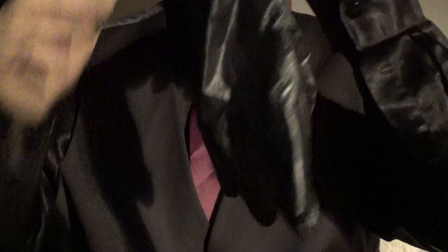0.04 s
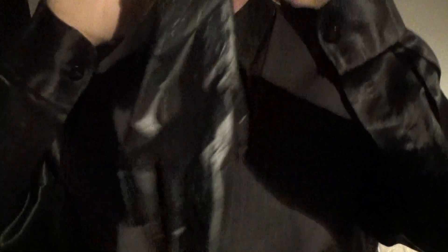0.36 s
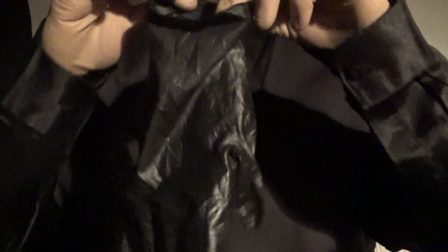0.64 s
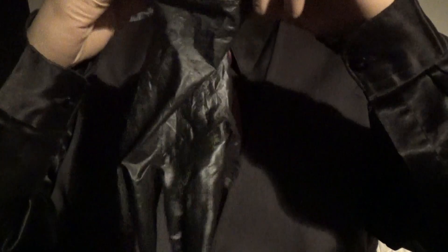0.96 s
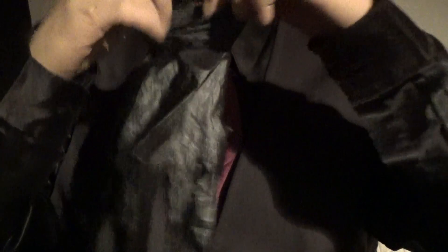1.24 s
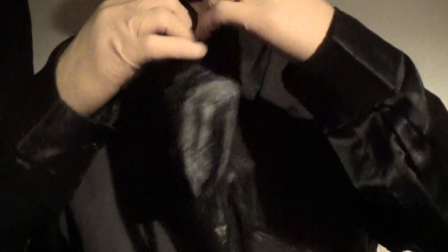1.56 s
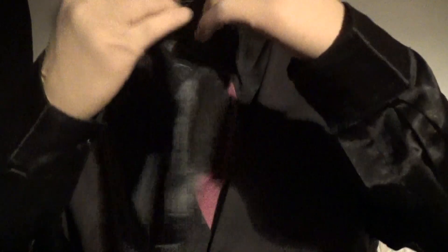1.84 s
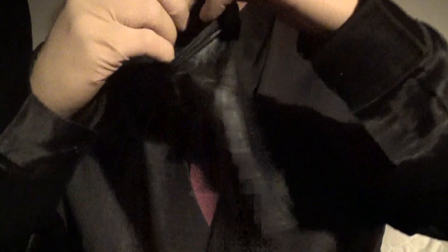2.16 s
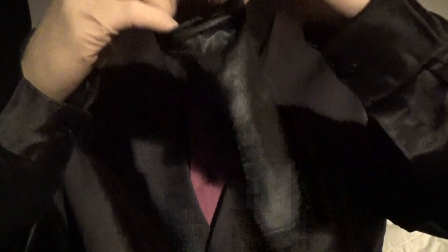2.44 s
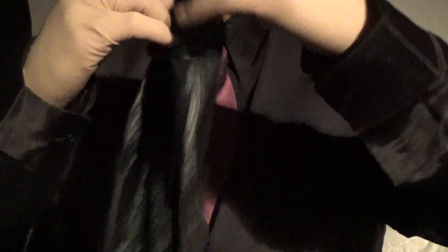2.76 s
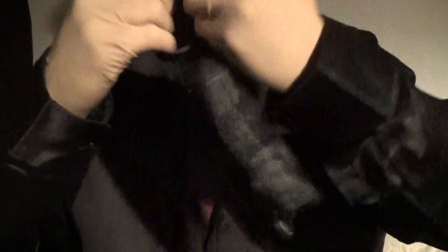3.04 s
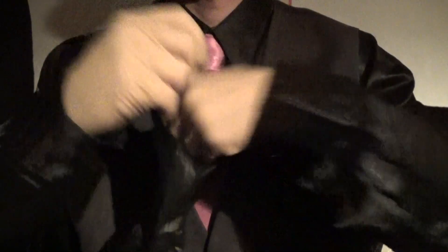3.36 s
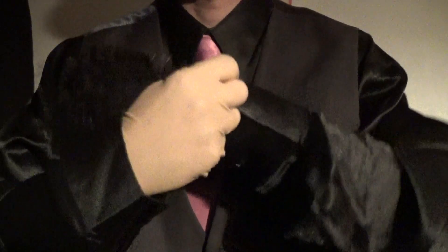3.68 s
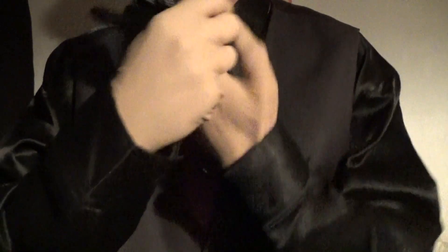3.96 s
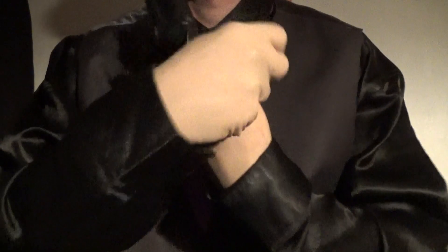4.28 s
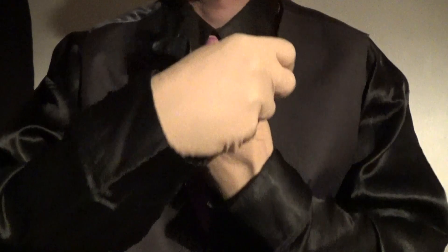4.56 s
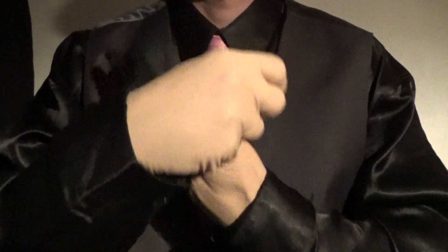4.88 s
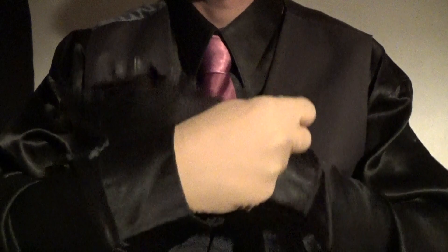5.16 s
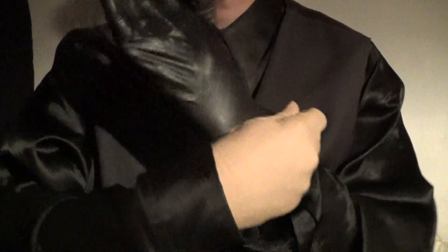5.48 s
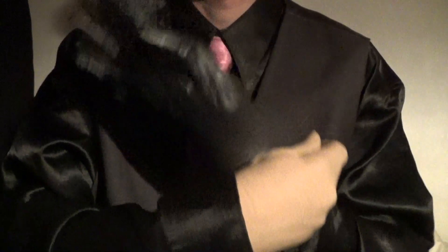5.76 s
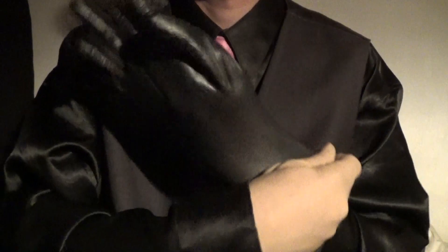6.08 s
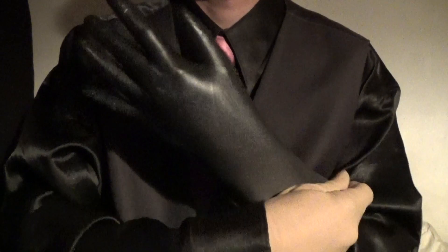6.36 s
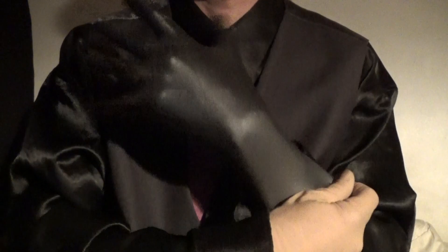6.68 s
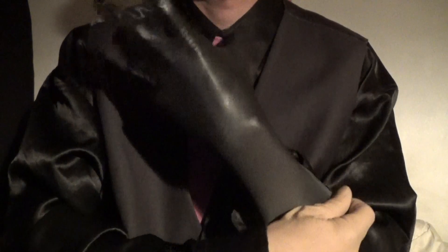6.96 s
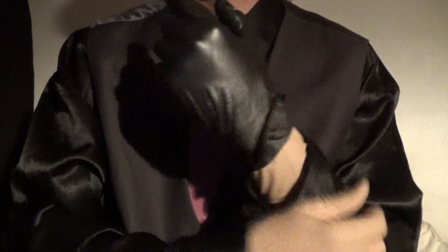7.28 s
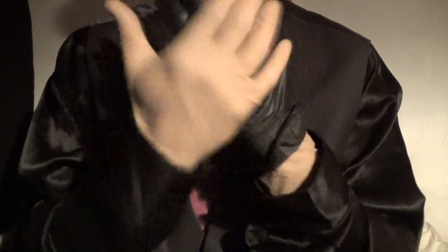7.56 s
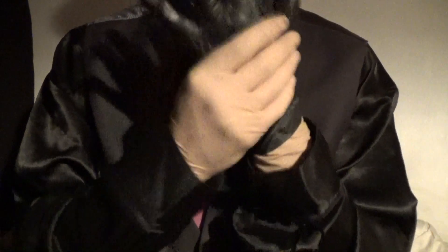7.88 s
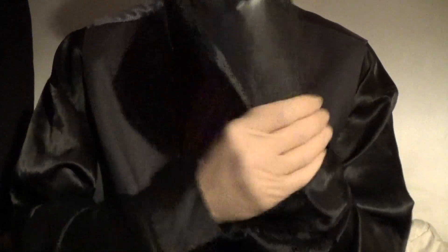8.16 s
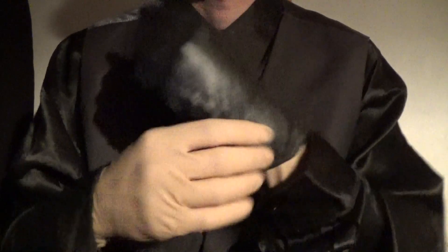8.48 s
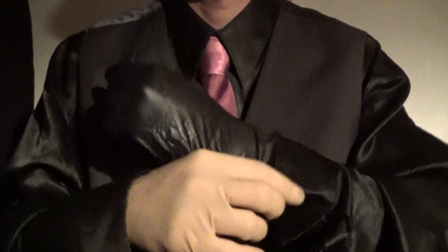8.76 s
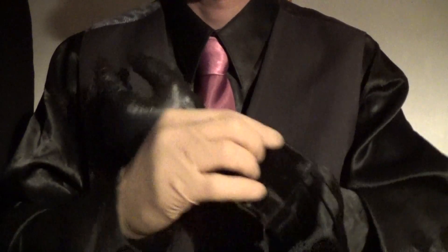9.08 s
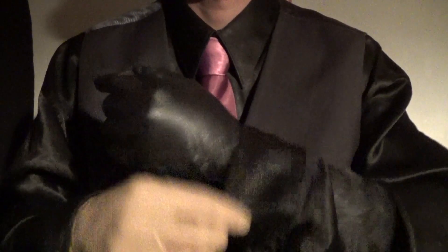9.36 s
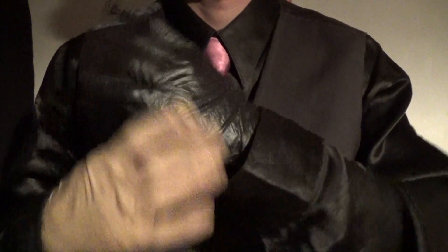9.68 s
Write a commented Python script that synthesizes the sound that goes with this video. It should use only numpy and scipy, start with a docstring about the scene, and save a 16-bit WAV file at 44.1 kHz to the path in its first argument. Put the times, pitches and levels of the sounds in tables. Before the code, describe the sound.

Close, soft crinkling and swishing of a rubber glove stretched over a hand, its cuff squeaking and then snapping against the arm.

```python
"""A thin latex glove is shaken out and pulled over a hand, close up in a small quiet room.
Rubber and satin sleeves swish, creases crinkle and tick, and the rubber drags over skin in tiny slips,
juddering where it sticks and drumming on the air inside. The cuff squeaks free in stick-slip as it is
hauled up the arm, then is let go with a snap. Under it all lie room hush and a very faint chatter."""
import sys
import numpy as np
from scipy import signal
from scipy.fft import rfft, irfft
from scipy.io import wavfile
from scipy.ndimage import uniform_filter1d

SR = 44100
rng = np.random.default_rng(int(sys.argv[2]) if len(sys.argv) > 2 else 0)


def unload_audio(sound):
    """Save the sound as a 16-bit wav file, at the path given as the first command line argument."""
    columns = np.transpose(np.atleast_2d(sound))
    # keep every value between -1 and 1, then stretch to whole-number steps
    steps = np.round(np.clip(columns, -1, 1) * 32767)
    wavfile.write(sys.argv[1], SR, steps.astype(np.int16))


N = 433503
TIME = np.arange(N) / SR

# Tone curves, one for each texture: frequency_hz, relative_db
HUSH_EQ = [(15, -64), (25, -8), (185, -2.5), (476, -7.5), (531, -2.5), (677, -10.5), (1840, -20.5),
           (16000, -22.5)]
RUBBER_EQ = [(1500, -16.5), (2900, -6), (3900, -4.5), (5800, -6.5), (7700, -8.5), (10000, -4), (12500, -16),
             (16000, -21.5)]
SATIN_EQ = [(2500, -28.5), (3600, -12), (4800, -4), (7500, -5), (9900, 0.5), (12500, -11.5), (16000, -22)]
FRICTION_EQ = [(40, -46.5), (300, -6.5), (700, 0), (1500, -3), (2000, -3), (3300, -8.5), (12000, -25.5)]
HOLLOW_EQ = [(60, -28.5), (125, -2.5), (220, -3.5), (320, 2.5), (480, -3.5), (900, -10.5), (3000, -57)]
CRACK_EQ = [(200, -15.5), (800, -8), (1600, -7.5), (2900, -1.5), (4150, -1), (5300, -0.5), (7500, -3.5),
            (10000, 0.5), (12000, -8), (16000, -26)]
SQUEAK_EQ = [(60, -24), (700, -11), (1700, -10.5), (3400, 1), (5000, 1.5), (6600, -11.5), (10000, -0.5),
             (12000, -23)]
# Rubber pulled over skin: peak_s, rise_s, fall_s, swish_db, friction_db (before its boost), hollow_db
PULLS = [(0.7, 0.058, 0.1, -63.5, -64.5, -64.5), (0.79, 0.074, 0.13, -62, -67, -69),
         (2.785, .012, 0.054, -60.5, -66.5, -70), (3.41, 0.18, 0.2, -57.5, -65.5, -64),
         (3.62, 0.084, 0.10188, -61, -67.5, -69.5), (3.94, 0.157, 0.11, -61, -69, -68.5),
         (4.21, 0.04348, 0.0471, -57.5, -67.5, -62.5), (4.395, 0.028, 0.0555, -57.5, -62.5, -64),
         (4.811, 0.095, 0.03313, -54, -61, -68), (4.954, 0.053, 0.072, -52.5, -63, -68.5),
         (5.08, 0.1467, 0.07, -60.5, -63.5, -55), (5.2, 0.17, 0.13, -58.5, -67.5, -62.5),
         (5.35, 0.13255, 0.16, -60, -71, -60), (5.7, 0.078, 0.1, -58.5, -65.5, -62),
         (6.268, 0.021, 0.046, -43.5, -52, -46), (6.36, .014, 0.027, -43.5, -51.5, -55),
         (6.5, 0.05911, 0.075, -52, -63, -54.5), (6.69, 0.085, 0.21, -62, -70.5, -66),
         (8.14, 0.12966, 0.03914, -56.5, -70, -80)]
# Loose rubber or a sleeve sweeping past: peak_s, rise_s, fall_s, swish_db, satin_share
SWEEPS = [(1.02, 0.0883, 0.122, -68, .3), (1.18, 0.04916, 0.095, -60, 0.08), (1.61, 0.16, 0.18, -59.5, 0),
          (2.06, 0.079, 0.1, -61.5, 0), (2.268, 0.01275, 0.02643, -60.5, 0), (2.87, .06, 0.62, -63, 0),
          (3.02, 0.026, 0.02374, -55, 0.59), (3.268, 0.0184, 0.0477, -52, 1), (3.44, 0.22, 0.086, -53.5, 1),
          (6.247, 0.022, 0.038, -42.5, 0.27), (7.58, 0.41, 0.2081, -65, 0.25),
          (7.87, 0.0588, 0.0588, -56.5, 0.29), (8.3, 0.0725, 0.101, -58, 0.76),
          (9.07, 0.1173, 0.074, -56.5, 0.72), (9.44, 0.15326, 0.077, -52.5, 0.92)]
# The hanging glove crumpling: peak_s, rise_and_fall_s, level_db
CRUMPLES = [(1.42, 0.0655, -65.5), (1.64, 0.081, -61.5), (2.465, 0.03335, -62.5), (3.1, .15, -64)]
# Hard-dragged rubber juddering: peak_s, rise_s, fall_s, rate_hz, depth
JUDDERS = [(.77, 0.29, 0.2474, 131.88, 0.98), (1.68, 0.027, 0.0735, 45, 0.4), (4.719, .12, 0.12, 70, 0.86)]
# Small folds flicking over with a tick: start_s, pitch_hz, ring_db
FLICKS = [(1.0705, 1700, -55.5), (1.8262, 3553, -48.5), (2.5217, 1200, -54), (3.1262, 4786, -49.5),
          (3.194, 11000, -51), (3.2014, 7500, -54.5), (4.063, 7000, -51), (4.175, 11560, -52),
          (4.254, 7500, -53.5), (6.5852, 7063, -46.5), (6.797, 4162, -51), (7.031, 9800, -58)]
# Scratchy steps of rubber creeping under a steady pull: start_s, crack_db
CREEPS = [(1.69, -60.5), (1.712, -61), (1.7362, -61.5), (1.76, -60.5), (5.3743, -51.5), (5.799, -56.5),
          (5.847, -55), (5.878, -56), (5.898, -54.5), (5.931, -56.5), (6.05, -57.5), (6.0766, -59),
          (6.102, -60), (6.126, -61.5), (6.1932, -58.5), (6.215, -49.5), (6.4358, -51)]
# Taut rubber let go to slap down: start_s, half_length_s, crack_db, thump_db, pitch_hz, ring_db
SNAPS = [(3.5183, 0.0042, -51.5, -61, 9900, -50), (4.1975, 0.00081, -38.5, -52.5, 1595, -45),
         (4.795, 0.003, -39, -48, 4030, -42.5), (4.9505, 0.0041, -54, -48, 2921, -49),
         (7.1638, 0.0038, -43, -49.5, 2080, -44.5), (7.168, 0.0014, -36, -44, 4200, -38),
         (7.1927, .0028, -35, -56, 3600, -37), (7.1976, 0.0013, -22.5, -37.5, 8200, -25)]
# Pops of trapped air or a taut patch of rubber: start_s, pitch_hz, peak_db, swell_s
POPS = [(3.63, 1951, -44.5, 0.001196), (4.951, 315.3, -37, 0.002763), (4.951, 1710, -39.5, .0012),
        (7.1979, 4000, -11, 0.00024)]
# The stretched cuff breaking loose: time_s, slip_rate_hz, level_db
CUFF_SQUEAK = [(6.3245, 2100, -70), (6.3257, 2100, -30), (6.3285, 2080, -32), (6.332, 2050, -48),
               (6.3335, 1700, -37), (6.3353, 1675, -19), (6.3375, 1640, -19), (6.3395, 1500, -26),
               (6.3408, 1100, -20), (6.3433, 950, -23), (6.349, 520, -48)]
CREASE_PITCHES_HZ = np.geomspace(3500, 6400, 9)


def amp(db):
    """Decibels to gain."""
    return 10 ** (np.asarray(db) / 20)


def unit_rms(x):
    """Scale to unit power."""
    return x / np.sqrt(np.mean(x ** 2) + 1e-20)


def drift(rate_hz):
    """Smooth random modulation of unit power."""
    knots = rng.standard_normal(N // 8)
    return unit_rms(np.interp(TIME * rate_hz, np.arange(len(knots)), knots))


def equalise(x, curve, size=4096):
    """Minimum-phase EQ with no pre-ring; white noise keeps its power."""
    hz, db = np.transpose(curve)
    gain = amp(np.interp(np.log(np.fft.rfftfreq(size, 1 / SR) + 1), np.log(hz), db))
    cepstrum = irfft(np.log(gain))
    cepstrum[1:size // 2] *= 2
    cepstrum[size // 2 + 1:] = 0
    response = irfft(np.exp(rfft(cepstrum)))[:size // 2]
    response /= np.linalg.norm(response)
    return signal.oaconvolve(np.atleast_2d(x), response[None], axes=1)[:, :N]


def widen(pair, side_db):
    """Two unrelated signals become mid and side; deep bass and high treble stay centred."""
    side = signal.sosfilt(signal.butter(1, [90, 5000], "band", fs=SR, output="sos"), pair[1])
    return pair[0] + amp(side_db) * side * np.array([[1], [-1]])


def room_hush():
    """The soft, low air of a quiet room."""
    air = widen(rng.standard_normal((2, N)), side_db=-10)
    return amp(-67) * equalise(air, HUSH_EQ)


def faint_chatter(rate_hz, band_hz, level_db):
    """A narrow band of noise pulses steadily in the background."""
    gate = np.exp(4 * np.cos(2 * np.pi * rate_hz * (TIME - .0224)))
    band = signal.butter(2, band_hz, "band", fs=SR, output="sos")
    return amp(level_db) * unit_rms(signal.sosfilt(band, gate * rng.standard_normal(N)))


def stroke(peak_s, rise_s, fall_s):
    """One hand movement swells and eases off, 10 dB down at one rise or fall time from its peak."""
    away = np.maximum((peak_s - TIME) / rise_s, (TIME - peak_s) / fall_s)
    gain, near = np.zeros(N), away < 5
    gain[near] = amp(-10 * away[near] ** 1.3)
    return gain


def hand_movements():
    """Overlapping sweeps and pulls add in power: gains of rubber, satin, friction and hollow drumming."""
    rubber, satin = np.zeros((2, N))
    for peak_s, rise_s, fall_s, swish_db, satin_share in SWEEPS:
        power = (amp(swish_db) * stroke(peak_s, rise_s, fall_s)) ** 2
        rubber += (1 - satin_share) * power
        satin += satin_share * power
    # The hands never quite rest, so a light touch runs under the pulls.
    glide, friction, hollow = (np.full(N, amp(db) ** 2) for db in (-72.5, -74, -77.5))
    for peak_s, rise_s, fall_s, swish_db, friction_db, hollow_db in PULLS:
        power = stroke(peak_s, rise_s, fall_s) ** 2
        glide += amp(swish_db) ** 2 * power
        friction += amp(friction_db) ** 2 * power
        hollow += amp(hollow_db) ** 2 * power
    sleeve_share = 0.1528
    rubber += (1 - sleeve_share) * glide
    satin += sleeve_share * glide
    return np.sqrt([rubber, satin, friction, hollow])


def grains(per_s, scatter_db, hiss):
    """Two streams of uneven micro-slips, smoothed with hiss."""
    sizes = amp(scatter_db * np.minimum(rng.exponential(1, (2, N)), 4))
    signs = rng.choice([-1, 1], (2, N))
    clicks = unit_rms(sizes * signs * (rng.random((2, N)) < per_s / SR))
    return unit_rms(clicks + hiss * rng.standard_normal((2, N)))


def swish(rubber_gain, satin_gain):
    """Rubber glides in fine, fluttering grains and crinkles as it moves or crumples; satin only hisses."""
    flutter = rubber_gain * amp(1.3 * drift(130) + 1.6 * drift(40))
    rubber = equalise(flutter * grains(per_s=2000, scatter_db=4.5, hiss=1.0), RUBBER_EQ)
    satin = equalise(satin_gain * rng.standard_normal((2, N)), SATIN_EQ)
    crumpling = sum(amp(db) * stroke(peak_s, span_s, span_s) for peak_s, span_s, db in CRUMPLES)
    creases = np.hypot(.4 * flutter, crumpling) * crinkle(per_s=480, scatter_db=3.0, q=16.67)
    return widen(rubber + satin, side_db=-12) + creases


def crinkle(per_s, scatter_db, q):
    """Tiny creases flip at random, each ringing briefly at one of a few high pitches."""
    sizes = amp(scatter_db * np.minimum(rng.exponential(1, N), 3))
    flips = sizes * (rng.random(N) < per_s / SR)
    pitch_index = rng.integers(0, len(CREASE_PITCHES_HZ), N)
    creases = np.zeros(N)
    for k, hz in enumerate(CREASE_PITCHES_HZ):
        creases += signal.lfilter(*signal.iirpeak(hz, q, fs=SR), flips * (pitch_index == k) + 1e-18)
    return unit_rms(creases)


def skin_drag(friction_gain, hollow_gain, friction_boost_db):
    """Coarser slips of rubber on skin, which also drum on the air inside the glove."""
    grip = amp(1.45 * drift(110))
    friction = grains(per_s=1500, scatter_db=3.0, hiss=0.91) * grip * friction_gain
    hollow = grains(per_s=660, scatter_db=0.5, hiss=0.68) * grip * hollow_gain
    rasp = amp(friction_boost_db) * equalise(friction, FRICTION_EQ)
    drumming = equalise(hollow, HOLLOW_EQ)
    return widen(rasp, side_db=-1.5) + widen(drumming, side_db=-11.5)


def judder(sag_octaves_per_s):
    """Tremolo of rubber that catches and lets go once a cycle, slowing as the tension drains."""
    gain = np.ones(N)
    for peak_s, rise_s, fall_s, rate_hz, depth in JUDDERS:
        sagging_hz = rate_hz * 2 ** (-sag_octaves_per_s * np.clip(TIME - peak_s, -1, 1))
        cycle = np.cumsum(sagging_hz * (1 + .08 * drift(40))) / SR % 1
        release = unit_rms(np.exp(-cycle / 0.4))
        gain += depth * stroke(peak_s, rise_s, fall_s) * (release - 1)
    return gain


def contact_burst(count, attack, decay):
    """A dying ripple of tiny contacts, flat in tone; attack and decay are shares of its length."""
    age = np.linspace(0, 1, count)
    envelope = (1 - np.exp(-age / attack)) * np.exp(-age / decay)
    spectrum = rfft(rng.standard_normal(count) * envelope)
    flat = irfft(spectrum / np.abs(spectrum), count)
    return unit_rms(flat * np.sqrt(envelope))


def fold_slaps():
    """Flicks, creeps and snaps: a freed fold cracks down, thumps the air in the glove and rings briefly."""
    cracks, thumps, rings = np.zeros((3, N))
    # Creeps and flicks are miniature snaps, laid out in the columns of SNAPS.
    creeps = [(start_s, .005, db, db - 4, rng.uniform(1730, 5800), db - 4) for start_s, db in CREEPS]
    flicks = [(start_s, .0011, db - 9, db - 9, hz, db) for start_s, hz, db in FLICKS]
    for start_s, half_length_s, crack_db, thump_db, pitch_hz, ring_db in list(SNAPS) + creeps + flicks:
        at, count = int(start_s * SR), 2 * int(half_length_s * SR)
        cracks[at:at + count] += amp(crack_db) * contact_burst(count, attack=0.027, decay=0.5)
        thumps[at:at + count] += amp(thump_db) * contact_burst(count, attack=0.051, decay=0.24)
        push = np.pad(contact_burst(count, attack=.06, decay=.35), (0, SR // 100))
        ring = signal.lfilter(*signal.iirpeak(pitch_hz, Q=3.0, fs=SR), push)
        rings[at:at + len(ring)] += amp(ring_db) * np.sqrt(count) * ring / np.linalg.norm(ring)
    return equalise(cracks, CRACK_EQ) + equalise(thumps, HOLLOW_EQ), rings


def pops():
    """Trapped air or a taut patch swings up at one pitch and is damped almost at once."""
    out, age = np.zeros(N), TIME[:SR // 16]
    for start_s, pitch_hz, peak_db, swell_s in POPS:
        at = int(start_s * SR)
        envelope = amp(peak_db) * age / swell_s * np.exp(1 - age / swell_s)
        out[at:at + len(age)] += envelope * np.sin(2 * np.pi * pitch_hz * age)
    return out


def cuff_squeak():
    """One pulse a slip: the squeal dives as tension drains, and the slack rubber turns to a duller flap."""
    times_s, rates_hz, levels_db = np.transpose(CUFF_SQUEAK)
    rate_hz = np.interp(TIME, times_s, rates_hz)
    sounding = (TIME > times_s[0]) & (TIME < times_s[-1])
    envelope = amp(np.interp(TIME, times_s, levels_db)) * sounding
    slips = np.diff(np.floor(np.cumsum(rate_hz) / SR), prepend=0)
    pulses = slips * np.sqrt(SR / rate_hz) - np.sqrt(rate_hz / SR)  # even power, centred on zero
    slack = np.clip(1 - rate_hz / 1600, 0, 1)
    grit = (0.2666 + slack / 2) * rng.standard_normal(N)
    force = (pulses + grit) * envelope
    squeal = equalise(force * (1 - slack), SQUEAK_EQ)
    flap = amp(1.5) * equalise(force * slack, FRICTION_EQ)
    return squeal, flap


def room_reverb(send, treble_hz, early_t60_s, late_t60_s, late_db, build_s):
    """Clothes and walls swallow the treble; close reflections build and die, leaving a weak longer tail."""
    dulled = signal.sosfilt(signal.butter(1, treble_hz, fs=SR, output="sos"), send)
    age = TIME[:SR // 2]
    decay = amp(-60 * age / early_t60_s) + amp(late_db - 60 * age / late_t60_s)
    envelope = decay * (1 - np.exp(-age / build_s))
    spectrum = rfft(rng.standard_normal((2, len(age))) * envelope)
    flat = irfft(spectrum / np.abs(spectrum), len(age))  # favours no pitch
    local_rms = np.sqrt(uniform_filter1d(flat ** 2, size=400, axis=1) + 1e-20)
    response = widen(flat * envelope / local_rms, side_db=-5.5)
    response /= np.linalg.norm(response[0])
    return signal.oaconvolve(dulled, response, axes=1)[:, :N]


def scene():
    """The glove up front, a short room behind it, and a bed of hush and faint chatter."""
    rubber, satin, friction, hollow = hand_movements() * judder(sag_octaves_per_s=1.8)
    rub = swish(rubber, satin) + skin_drag(friction, hollow, friction_boost_db=4)
    slaps, rings = fold_slaps()
    squeal, flap = cuff_squeak()
    hits = slaps + flap
    ringing = rings + pops() + squeal
    bed = room_hush() + faint_chatter(rate_hz=25, band_hz=(2800, 3260), level_db=-78)
    # Small ringing patches of rubber reach the walls most weakly.
    send = amp(-11.5) * rub + amp(-7.5) * hits + amp(-16.5) * ringing
    room = room_reverb(send, treble_hz=8500, early_t60_s=0.13, late_t60_s=0.52, late_db=-21, build_s=0.0037)
    return rub + hits + ringing + room + bed


def record(dry):
    """A steep high cut at 15.9 kHz."""
    return signal.sosfilt(signal.ellip(10, .1, 80, 15900, fs=SR, output="sos"), dry)


dry = scene()
out = record(dry)
unload_audio(out)
```